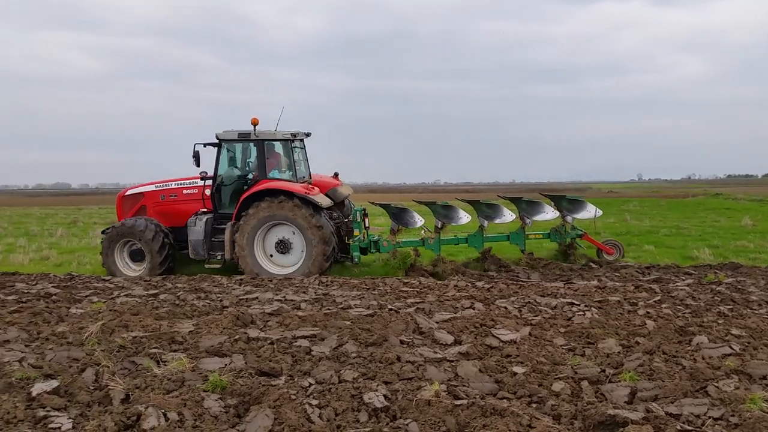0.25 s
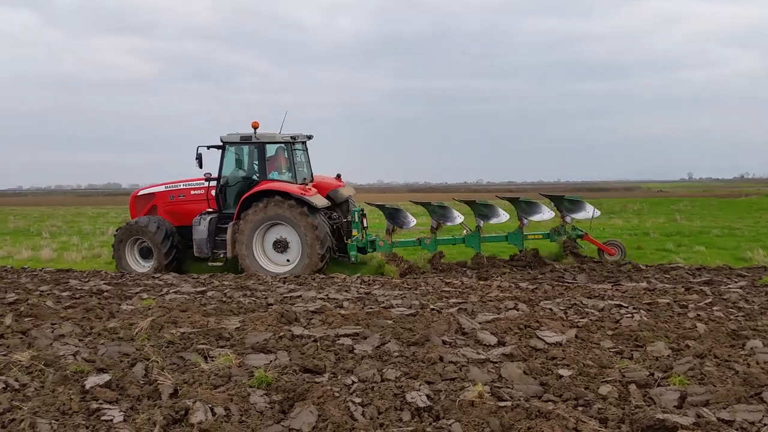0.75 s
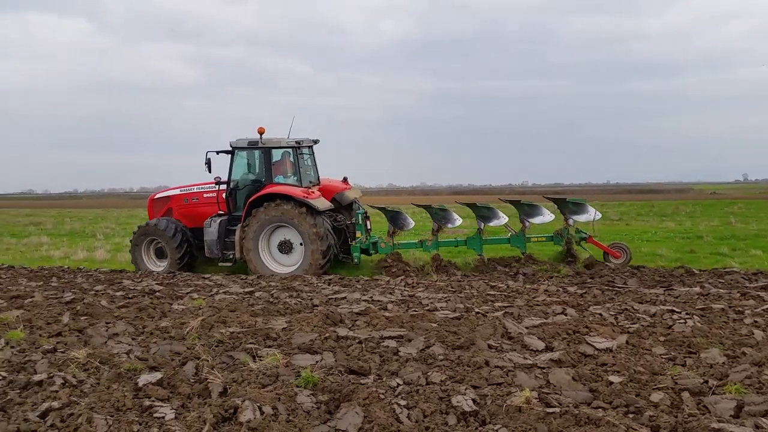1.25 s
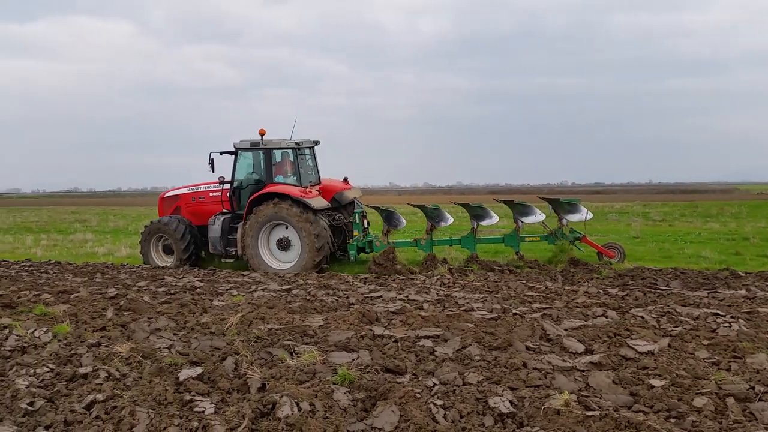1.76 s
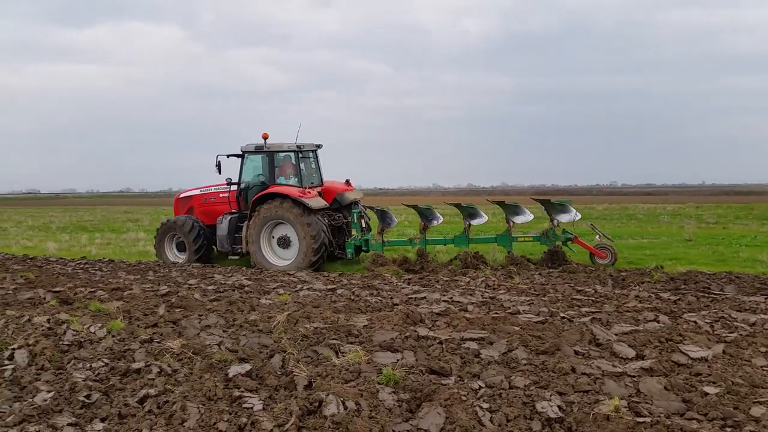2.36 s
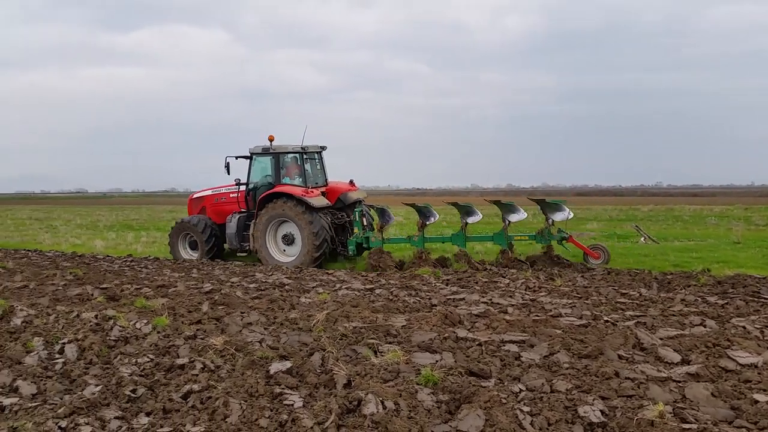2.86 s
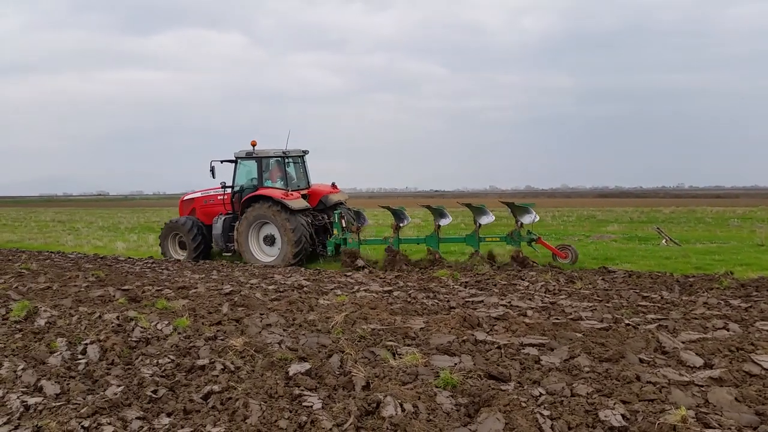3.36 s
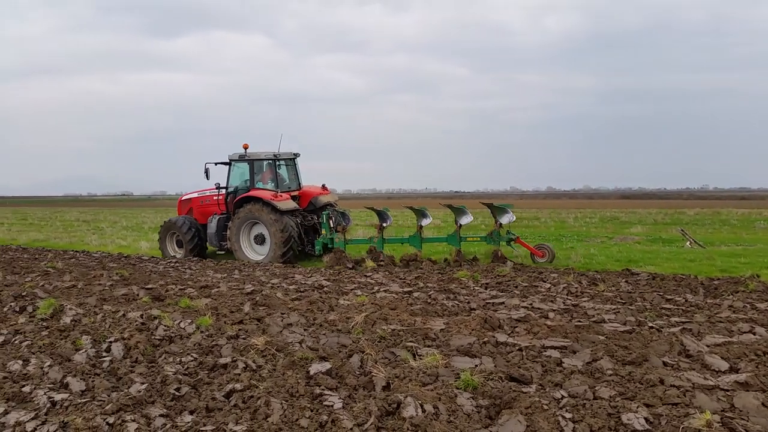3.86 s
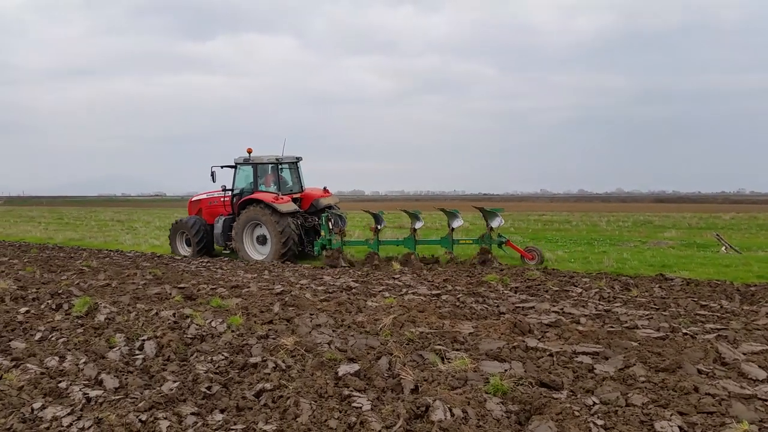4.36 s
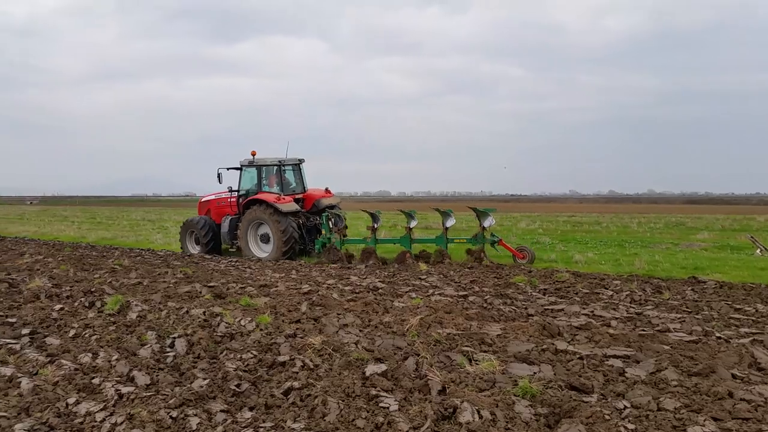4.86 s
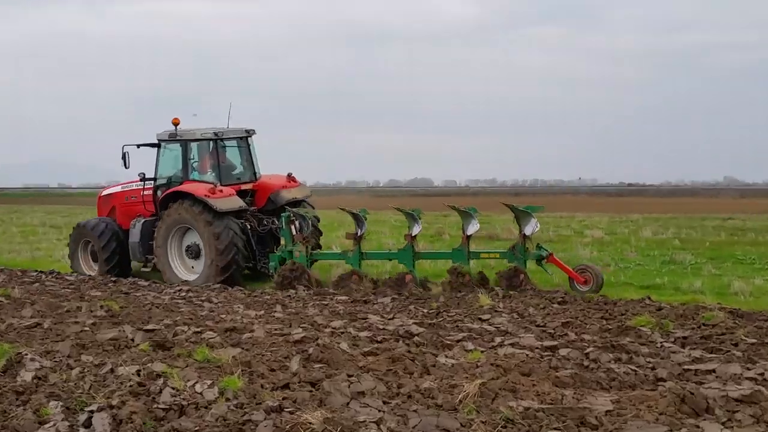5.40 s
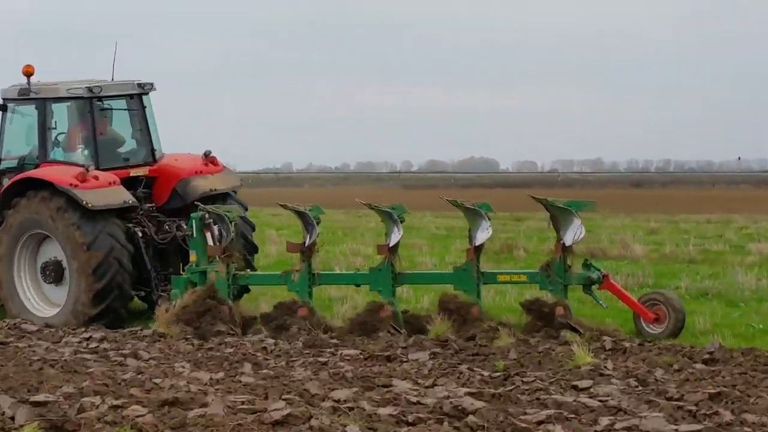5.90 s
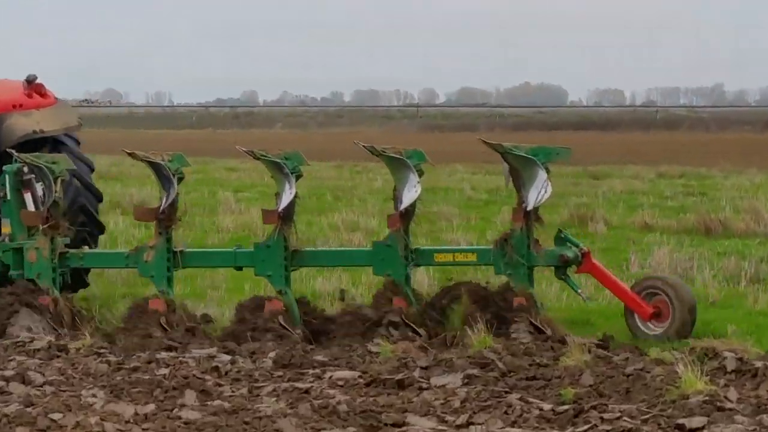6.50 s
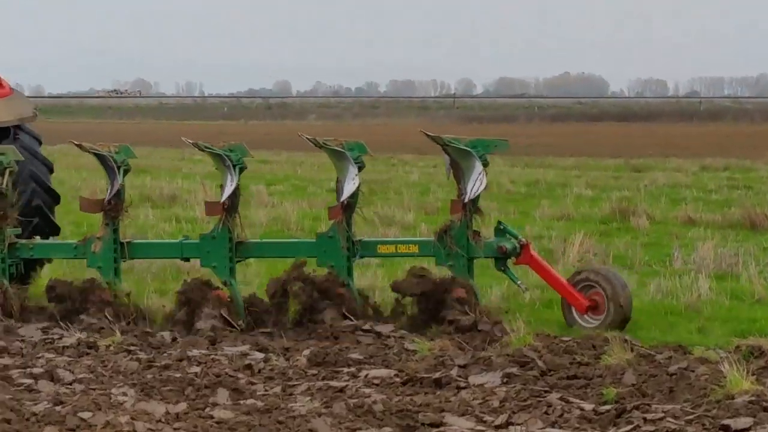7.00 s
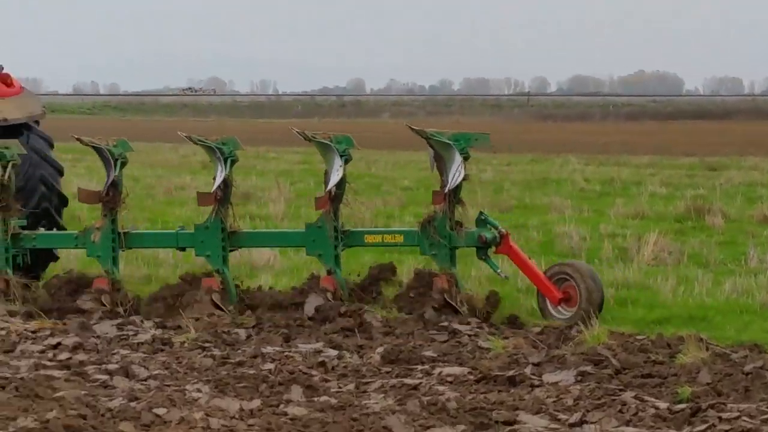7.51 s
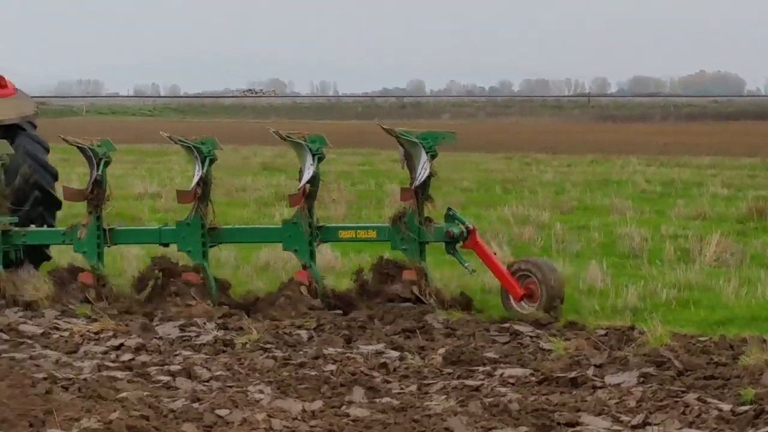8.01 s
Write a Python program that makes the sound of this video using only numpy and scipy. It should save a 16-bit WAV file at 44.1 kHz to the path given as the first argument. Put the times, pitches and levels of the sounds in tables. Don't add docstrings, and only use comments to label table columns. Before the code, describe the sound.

A heavy diesel tractor pulls a plough away across an open field, droning low with gear whine, chuffing hiss, wind and stones knocking steel.

```python
import sys
import numpy as np
from scipy import signal
from scipy.io import wavfile
from scipy.ndimage import uniform_filter1d

SR = 44100
rng = np.random.default_rng(int(sys.argv[2]) if len(sys.argv) > 2 else 0)


def dump(signal):
    limited = np.clip(np.atleast_2d(signal).T, -1, 1)
    pcm = np.round(limited * 32767).astype(np.int16)
    wavfile.write(sys.argv[1], SR, pcm)


def gain_from_db(level_db):
    decades = np.asarray(level_db, float) / 20
    return 10 ** decades


N = 363825
TIME = np.arange(N) / SR
EDGE_HZ = 14600
HALVES = np.array([[.5], [-.5]])

# time in seconds, engine cycles per second.
SPEED_HZ = [(0, 14.774), (1.2, 14.953), (2.4, 15.002), (3.3, 15.411), (4, 14.968), (4.75, 14.846),
            (5.5, 14.998), (6.4, 15.387), (6.8, 14.984), (7.25, 14.736), (7.9, 15.026), (8.25, 15.59)]
# time in seconds, turned away 0-1, wind in dB over the roar.
TURNING = [(0, 0, -6), (1, 0.03, -16), (3, 0.12, -24), (4, 0.11, -13), (4.6, 0.2, -11.5), (5.5, 0.61, 0),
           (6.5, 0.71, -6), (7, 0.77, -10.5), (7.6, 0.8, -4), (8.25, 1, -10)]
# frequency in Hz, left over right in dB.
TILT_DB = [(60, 4), (92, -0.5), (140, 1), (210, 1), (330, 1.0), (500, 3), (770, 2.0), (1170, -0.5),
           (1790, 5), (2740, 5), (4190, 4), (6410, -6), (9810, 19), (15000, -10)]
# frequency in Hz, lead of the left port in radians.
LEAD_RAD = [(0, 0), (1210, 1.0), (1640, 2), (1980, 1.37), (3360, 3.5), (3700, 5), (4050, 4.5), (7150, 5),
            (8180, 10), (10100, 12.5), (11300, 19), (12700, 21), (13600, 25.5), (15200, 20)]


def evened(x):
    return x / np.sqrt(np.mean(x ** 2) + 1e-20)


def read(points, hz):
    f, value = np.transpose(points)
    return np.interp(np.log(hz + 1), np.log(f + 1), value)


def column(table, k, t=TIME):
    rows = np.array(table)
    return np.interp(t, rows[:, 0], rows[:, k])


def add(mix, s, sound):
    part = mix[:, round(s * SR):][:, :sound.shape[1]]
    part += sound[:, :part.shape[1]]


def wander(hz):
    count = int(N / SR * hz) + 3
    knots = rng.standard_normal(count) + 1j * rng.standard_normal(count)
    return np.interp(TIME * hz, np.arange(count), knots) * np.sqrt(3 / 4)


def port_noise(left, right, patchy_db):
    # frequency in Hz, likeness 0-1.
    likeness = [(60, 0.98), (1000, 0.96), (1500, 0.8), (2000, 1), (2600, 0.57), (3250, 0.74), (3600, 0.15),
                (4100, 0.99), (5000, 0.19), (7000, 0.72), (7800, .05), (10000, 0.51), (12700, 1),
                (14500, .2)]
    hz = np.fft.rfftfreq(1024, 1 / SR)[:, None]
    t = np.arange(N // 256 + 5) * 256 / SR
    a, b, c, d, patches = rng.standard_normal((len(t), 513, 5)).T
    patches = uniform_filter1d(patches, size=8, axis=0)
    patches = evened(uniform_filter1d(patches, size=12, axis=1))
    same = np.clip(read(likeness, hz), 0, 1)
    first = a + 1j * b
    second = same * first + np.sqrt(1 - same ** 2) * (c + 1j * d)
    second = second * np.exp(-1j * np.interp(hz, *np.transpose(LEAD_RAD)))
    colours_db = np.array([left(hz, t), right(hz, t)]) + patchy_db * patches
    spectra = np.array([first, second]) * gain_from_db(colours_db) * (hz < EDGE_HZ)
    return evened(signal.istft(spectra, nperseg=1024, noverlap=768)[1][:, :N])


def tone(turns, hz, size):
    lead_rad = np.interp(hz, *np.transpose(LEAD_RAD)) * HALVES
    tilt = gain_from_db(read(TILT_DB, hz) * HALVES)
    return np.sqrt(2) * tilt * (size * np.exp(2j * np.pi * turns) * np.exp(1j * lead_rad)).real


def rung(modes):
    t = np.arange(7000) / SR
    rise = 1 - np.exp(-t / 0.000098)
    rings = (gain_from_db(db - 60 * t / t60_s) * np.sin(2 * np.pi * hz * t) for hz, db, t60_s in modes)
    return -rise * sum((-1) ** k * ring for k, ring in enumerate(rings))


def turned(facing, away):
    def shape_db(hz, t):
        share = np.clip(column(TURNING, 1, t), 0, 1)
        return read(facing, hz) + share * (read(away, hz) - read(facing, hz))
    return shape_db


def wind_noise():
    band = signal.butter(2, [45, 170], "band", fs=SR, output="sos")
    return evened(signal.sosfilt(band, rng.standard_normal((2, N))))


def puffs():
    # time in seconds, level in dB, length in seconds, left over right in dB.
    gusts = [(4.692, -28, 0.046, -10), (4.825, -24.5, 0.027, -7), (5.212, -25.5, 0.016, -4),
             (5.232, -30, 0.018, -6), (5.699, -19, 0.019, -14), (5.785, -28, 0.02, -9),
             (5.922, -28, 0.027, -5), (6.116, -24.5, 0.048, -24), (6.452, -18.5, 0.028, 9),
             (6.503, -25, 0.018, 10), (7.143, -30, 0.03, 9), (7.93, -30, 0.019, 9)]
    size = np.zeros((2, N))
    for s, db, length_s, pan_db in gusts:
        size += gain_from_db(db + pan_db * HALVES) * np.exp(-((TIME - s) / length_s) ** 2)
    return size * wind_noise()


def housing():
    # (Hz, level in dB, t60 in seconds).
    blows = [
        (4.6257, -29, [(9550, 4.5, 0.0026), (14400, -12, 0.0027), (5450, -10, 0.002), (3530, -8.5, 0.0031), (4000, -24, 0.043), (4200, -23, 0.024), (790, -4, 0.0059)]),
        (5.704, -4, [(70, -18, .08), (190, -19, .04)]),
        (6.101, 10, [(137.4, -18, 0.25), (430, -18.5, 0.024), (1100, -22, .008)]),
        (7.1768, -22, [(596, -1, 0.0072), (1700, -3, 0.0038), (2970, -1, 0.0033), (3900, -22, 0.044), (4100, -24, 0.04), (111, -12, 0.045), (8800, -22, .005)]),
    ]
    out = np.zeros((2, N))
    for s, right_db, modes in blows:
        add(out, s, gain_from_db([[0], [right_db]]) * rung(modes))
    return out


def plough():
    # time in seconds, peak in dB, ring in Hz, left over right in dB.
    knocks = [(5.6193, -16.5, 1520, 5), (5.722, -23, 1510, 0), (5.7533, -19, 1470, 7),
              (5.859, -15.5, 1440, 1), (5.981, -18, 1480, 10), (6.029, -12.5, 1560, 1),
              (6.0496, -10.5, 1490, 11), (6.101, -31, 1280, 6), (6.2404, -19.5, 1490, 9),
              (6.5096, -21, 1840, 3), (6.811, -26, 1760, 3), (7.1103, -22, 2170, 3), (7.8446, -22, 2100, 2),
              (8.085, -22, 1700, 6)]
    grit_db, grit_t60_s = -18.5, 0.079
    out, t = np.zeros((2, N)), np.arange(7000) / SR
    band = signal.butter(2, [900, 7000], "band", fs=SR, output="sos")
    cracks = signal.sosfilt(band, rng.standard_normal((len(knocks), len(t))))
    for (s, db, hz, pan_db), crack in zip(knocks, cracks):
        ring = rung([(hz, db - 3, .03), (1.5 * hz, db - 8.5, .035),
                     (3.1 * hz, db - 23, .03), (0.67 * hz, db - 5, .015)])
        ring = ring + gain_from_db(db + grit_db - 60 * t / grit_t60_s) * crack
        late = np.roll(ring, 6)
        add(out, s, gain_from_db(pan_db * HALVES) * np.array([ring, late]))
    return out


def hiss(cycle):
    # frequency in Hz, level in dB per Hz.
    facing_left = [(2500, -57), (3500, -21), (4000, -11), (4400, -21.5), (5100, -21), (6000, -10),
                   (7500, -12), (9800, -4), (10600, -8), (11000, -19), (12500, -6), (13400, -16),
                   (14300, -8.5)]
    facing_right = [(2500, -12.5), (3650, -23.5), (4300, -11.5), (5500, -10.5), (6500, -23), (7100, -12),
                    (7900, -43), (8600, -15), (9500, -16), (10500, -9.5), (11500, -2), (12200, 3),
                    (13500, 0), (14500, -20)]
    away_left = [(2500, 0), (3600, -4.5), (4300, -14), (5100, -25), (6200, -16), (7000, -11.5), (8500, -4),
                 (9300, -22), (10300, -12.5), (11500, -5), (12800, -15), (13400, -28), (14200, -17)]
    away_right = [(2500, -36), (3600, -15), (4300, -3.5), (5200, -14), (6100, -14), (7000, -24),
                  (8000, -25), (9000, -15), (10500, -10), (12000, 5), (13500, -5), (14500, -32)]
    # time in seconds, pitch in Hz, level in dB over the hiss.
    turbo = [(0, 10120, -1), (.6, 10450, -6), (1.3, 10630, -3), (2.7, 10660, -2), (3.1, 10430, -5),
             (3.6, 9880, -2), (4, 9830, -2), (4.5, 10100, -4), (5, 10250, -5), (5.7, 10150, -6),
             (6.2, 10060, -12), (6.7, 9800, -5), (7.1, 9800, -7), (7.5, 10200, -9), (7.9, 10400, -13),
             (8.25, 10150, -8)]
    hiss_db, away_db = -14, -6
    vent_s, vent_db, vent_length_s = 5.94, 3.5, 0.23

    late = cycle - .31 - .004 * TIME
    since, number = late % 1, np.floor(late).astype(int) + 1
    strength = gain_from_db(1.8 * rng.standard_normal(number.max() + 1))[number]
    chuff = strength * (1 - np.exp(-since / .03)) * np.exp(-since / .32)

    rush = port_noise(turned(facing_left, away_left), turned(facing_right, away_right), 1.44)
    high = signal.sosfiltfilt(signal.butter(2, 6500, "high", fs=SR, output="sos"), rush)
    air = rush - high + high * evened(np.sqrt(1 + 8.5 * chuff ** 2))

    whistle_turns = np.cumsum(column(turbo, 1)) / SR
    blades = (wander(110) * np.exp(2j * np.pi * whistle_turns)).real
    blades = gain_from_db(column(turbo, 2) - 9.3) * blades * gain_from_db([[2.5], [-8.0]])
    vent = vent_db * np.exp(-((TIME - vent_s) / vent_length_s) ** 2)
    return gain_from_db(4.5 + hiss_db + away_db * column(TURNING, 1) + vent) * (air + blades)


def gears(cycle):
    # engine order, width in Hz, level in dB over the roar, loudest at seconds.
    meshes = [(46.86, 20, -17.5, 0.55), (57.4, 10, -14.5, 0.26), (51.04, 7, -14, 2.9),
              (119.7, 12, -19.5, 0.98), (23.43, 9, -11, 1.04)]
    out = np.zeros((2, N))
    for order, width_hz, db, loudest_s in meshes:
        swell_db = -np.minimum(3.1 * abs(TIME - loudest_s), 7)
        out += tone(order * cycle, order * 15, gain_from_db(db + swell_db) * (0.53 + 0.78 * wander(width_hz)))
    return out


def roar(cycle):
    # frequency in Hz, level in dB per Hz.
    boom_shape = [(25, -27), (45, -31), (65, 7.5), (120, -13.5), (200, -3), (260, 1), (340, -4.5),
                  (420, -12), (500, -20.5), (700, -38.5)]
    clatter_shape = [(300, -55), (500, -19.5), (700, -12.5), (850, -15.5), (1200, -18), (1600, -19.5),
                     (1950, -17), (2300, -24), (2700, -29.5), (3200, -30), (3700, -44.5), (4500, -74)]
    broadside_s, broadside_db, aside_db_per_s = 3.95, 2, 0.72

    def tilted_noise(shape, patchy_db):
        return port_noise(lambda hz, t: read(shape, hz) + read(TILT_DB, hz) / 2,
                          lambda hz, t: read(shape, hz) - read(TILT_DB, hz) / 2, patchy_db)

    boom = tilted_noise(boom_shape, 1.1)
    clatter = tilted_noise(clatter_shape, 1.4)
    throb = 1 + .06 * np.cos(2 * np.pi * 6 * cycle) + .04 * np.cos(2 * np.pi * 2 * cycle)
    surge = 1 + .1 * np.cos(2 * np.pi * (6 * cycle + .38))
    clatter_db = -5.0 + broadside_db - aside_db_per_s * abs(TIME - broadside_s)
    return gain_from_db(-2.5) * boom * surge + gain_from_db(clatter_db) * clatter * throb


def exhaust(cycle):
    # time in seconds, firing tone in dB over the roar, octave in dB.
    ground = [(0, -7.5, 3), (1.3, -6, 2.5), (1.8, -3, 1), (3.4, -5, -0.5), (4.1, -4.5, 1), (5.6, -1, 2.5),
              (6.1, 0.5, -4.5), (6.6, -4, -2.5), (7, -5.5, 0.3), (8.25, -1, -3)]
    # engine order, level in dB over the roar.
    uneven = [(3, -33), (9, -31), (10, -18.5), (11, -32), (13, -17.5), (14, -20.5), (15, -11.5),
              (16, -11.5), (20, -26), (21, -22.5), (24, -20.5), (25, -28), (26, -29.5), (27, -28)]
    firing_flutter, octave_flutter = 0.24, 0.089
    rate_hz = column(SPEED_HZ, 1).mean()
    firing = gain_from_db(column(ground, 1)) * (1 + firing_flutter * wander(14))
    octave = gain_from_db(column(ground, 2)) * (1 + octave_flutter * wander(14))
    third = gain_from_db(-14) * (1 + .4 * wander(3))
    out = tone(6 * cycle - .3, 6 * rate_hz, firing)
    out += tone(12 * cycle + .08, 12 * rate_hz, octave)
    out += tone(18 * cycle + .46, 18 * rate_hz, third)
    for order, db in uneven:
        size = gain_from_db(db) * (1 + .5 * wander(2.995))
        out += tone(round(order) * cycle + rng.random(), order * rate_hz, size)
    return out


def heard_db():
    # time in seconds, roar in dB before gain control.
    distance = [(0, -18.5), (3.2, -19.5), (4.5, -22), (5.8, -24), (6.2, -22.5), (7.1, -23.5), (8.25, -25)]
    # start in seconds, sudden dip in dB, deepest in dB, sinking in seconds, release at seconds.
    ducks = [
        (4.61, -4.5, -11.5, 0.28, 5.402),
        (7.17, -1.5, -6, 0.4, 7.904),
    ]
    recover_db_per_s, snap_s = 31.5, .02
    duck_db = 0
    for s, sudden_db, deep_db, sinking_s, release_s in ducks:
        recovered_s = release_s - deep_db / recover_db_per_s
        duck_db = duck_db + np.interp(TIME, [s, s + snap_s, s + sinking_s, release_s, recovered_s],
                                      [0, sudden_db, deep_db, deep_db, 0])
    return column(distance, 1) + duck_db


def flinch():
    # click in seconds, dip in dB, lead in seconds, recovery in seconds.
    dips = [
        (4.6255, -5, 0.013, 0.012),
        (7.178, -9.5, 0.016, 0.0064),
    ]
    dip_db = sum(db * np.interp(TIME, [s - lead_s - .004, s - lead_s, s, s + back_s], [0, 1, 1, 0])
                 for s, db, lead_s, back_s in dips)
    return gain_from_db(dip_db)


def scene():
    cycle = np.cumsum(column(SPEED_HZ, 1)) / SR
    wind = gain_from_db(column(TURNING, 2) + 1.9 * wander(4.9).real) * wind_noise()
    field = wind + hiss(cycle) + gears(cycle) + roar(cycle) + exhaust(cycle)
    return flinch() * (gain_from_db(heard_db()) * field + puffs() + plough()) + housing()


def starved(x, under_db, follow):
    # frequency in Hz, readiness in dB at first, readiness in dB at last.
    cancelling = [(3200, 7.5, -1), (3950, 6.5, 2), (4500, 1.5, -4), (5200, 1.5, 1), (6200, -.5, 4)]
    opposed_db_per_khz = 26
    hz, t, z = signal.stft(x, SR, window="cosine", nperseg=2048, noverlap=1024)
    power = uniform_filter1d((abs(z) ** 2).sum((0, 1)), size=9)
    loud_db = 10 * np.log10(power + 1e-20)
    luck_db = 3 * uniform_filter1d(rng.standard_normal((70, len(t))), size=3)
    bar_db = under_db + follow * (loud_db + 13.5) + luck_db

    def kept(part, spare_db):
        band_power = (abs(part[128:688]) ** 2).reshape(70, 8, -1).mean(1)
        band_db = 10 * np.log10(band_power + 1e-20)
        keep = np.ones(part.shape)
        keep[128:688] = np.repeat(np.clip(band_db - bar_db - spare_db, .003, 1), 8, axis=0)
        return keep

    mid = z.mean(0)
    band_hz = hz[132:688:8, None]
    ready_db = np.max([first_db + (last_db - first_db) * t * SR / N
                       - opposed_db_per_khz * abs(band_hz - f) / 1000
                       for f, first_db, last_db in cancelling], axis=0)
    opposed = ((abs(hz - 3230) < 170) | (abs(hz - 3970) < 170))[:, None]
    z = z - mid * (1 - kept(mid, ready_db))
    z = np.array([np.where(opposed, 1, kept(port, 0)) * port for port in z])
    z = z * np.where(hz > EDGE_HZ + 500, .03, 1)[:, None]
    return signal.istft(z, SR, window="cosine", nperseg=2048, noverlap=1024)[1][:, :N]


def band_limit(x):
    return signal.sosfilt(signal.butter(12, 15600, fs=SR, output="sos"), x)


def record(dry):
    thinned = starved(dry, under_db=-70.5, follow=.92)
    return band_limit(np.clip(thinned, -.94, .94))


dry = scene()
out = record(dry)
dump(out)
```